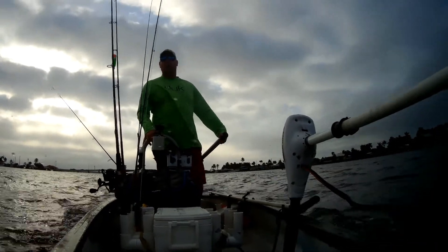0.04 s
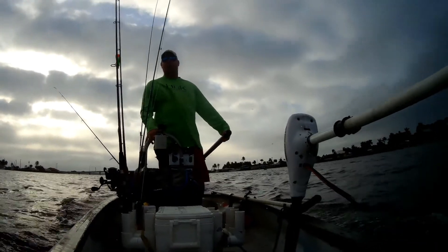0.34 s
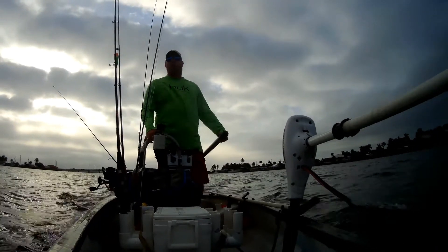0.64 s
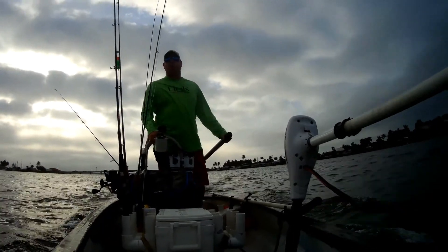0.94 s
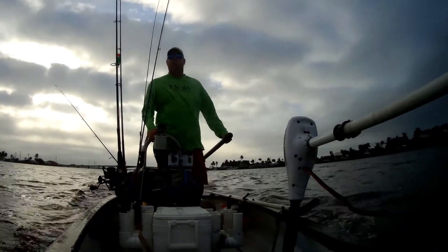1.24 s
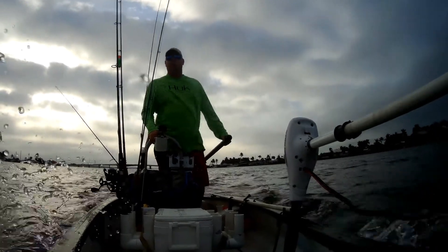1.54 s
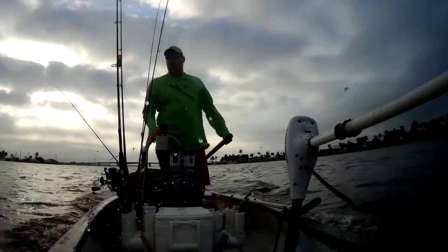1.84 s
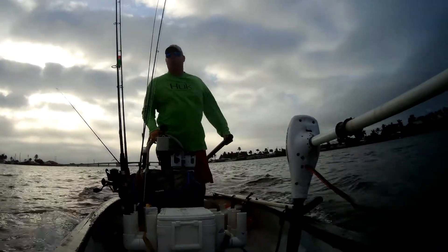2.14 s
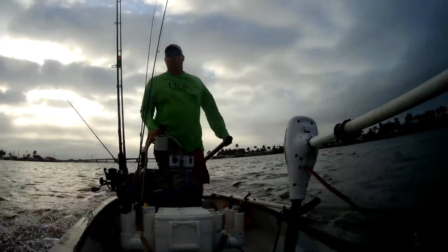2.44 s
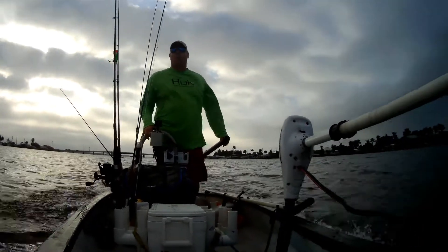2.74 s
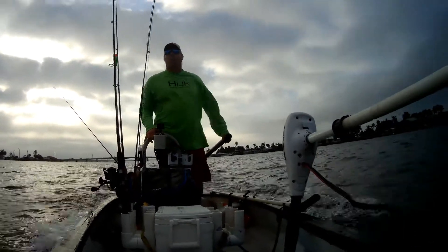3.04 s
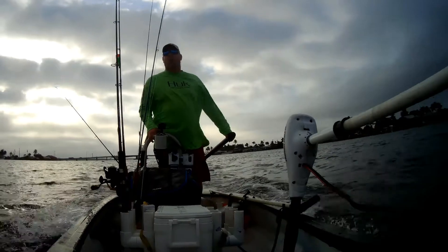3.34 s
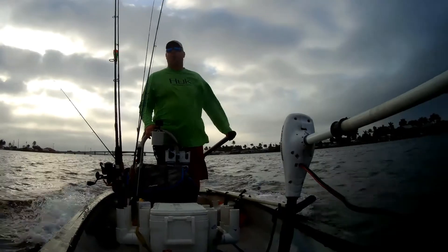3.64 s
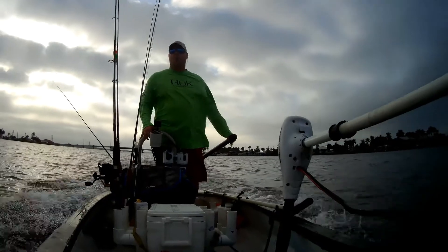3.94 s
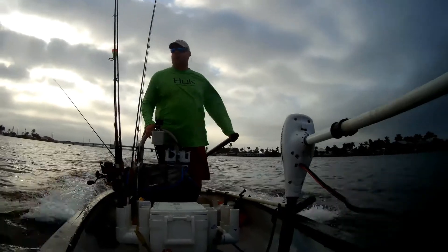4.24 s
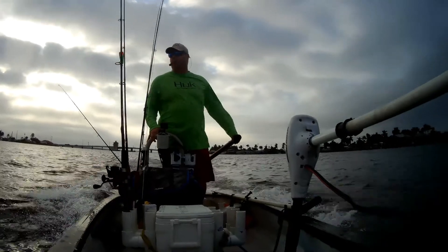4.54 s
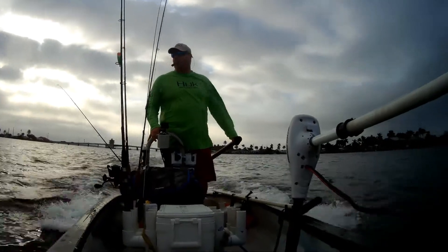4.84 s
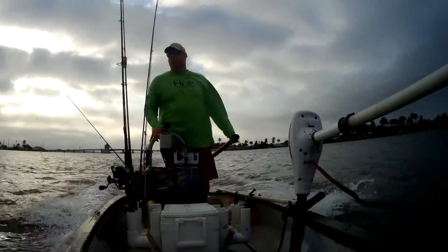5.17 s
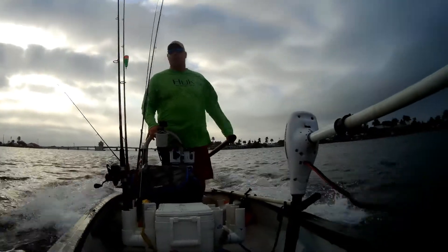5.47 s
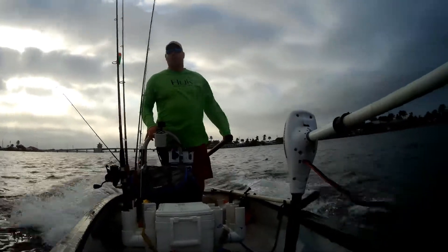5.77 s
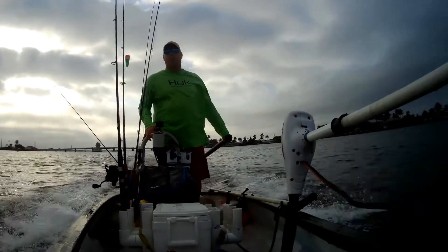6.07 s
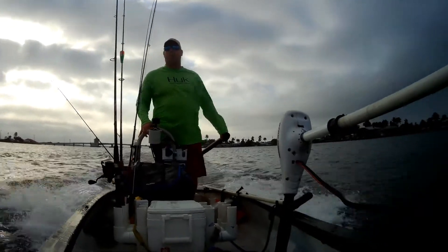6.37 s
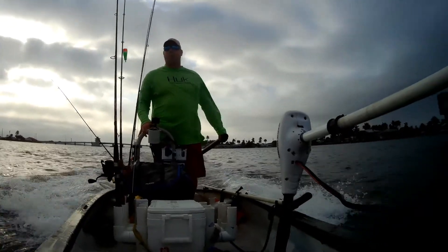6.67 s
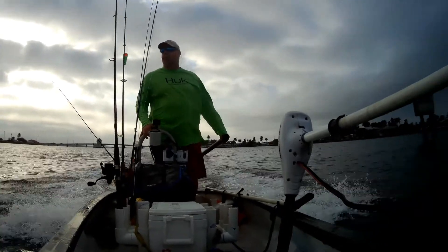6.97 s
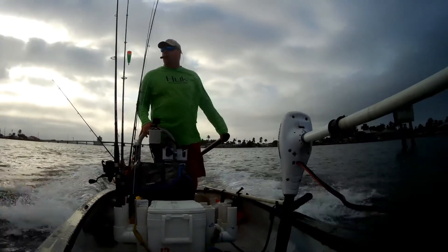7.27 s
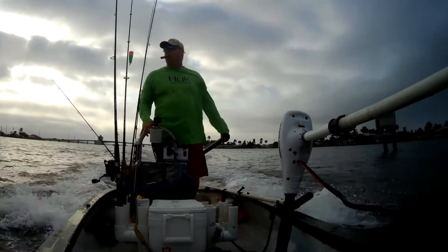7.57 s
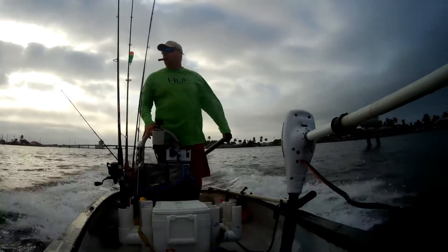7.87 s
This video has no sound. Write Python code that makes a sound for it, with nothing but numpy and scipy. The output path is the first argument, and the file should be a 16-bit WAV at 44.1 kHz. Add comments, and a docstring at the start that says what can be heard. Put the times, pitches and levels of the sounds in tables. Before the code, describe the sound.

A small outboard motor idles quietly for the first half second, with water bubbling and slapping against the hull of a skiff. At about 0.5 seconds the throttle opens, and the motor climbs quickly in pitch and loudness. By 2 seconds it is a loud, steady drone, which keeps rising slightly until the end at about 8 seconds. During the first 3 seconds, chop thumps the hull, the bow wave splashes and gurgles in surges, and a few drops click sharply on the camera case. After that the water merges into a more even rush with gentler swells and a faint hiss of spray, while low wind buffeting grows with the speed. From about 5 seconds, faint drops tick on the boat. Everything is heard on board through a closed waterproof case, which muffles the treble and adds a slight ring.

```python
"""A small four-stroke outboard idles, is throttled up and pushes a skiff onto the plane.
Firings and propeller blades drone through the hull, chop slaps it, the bow wave splashes and
bubbles, drops tick and wind buffets. All is heard on board through a closed waterproof camera
case, which rings and muffles the treble."""
import sys
import numpy as np
from scipy import signal
from scipy.fft import rfft, irfft
from scipy.io import wavfile
from scipy.ndimage import uniform_filter1d, minimum_filter1d

SR = 44100
rng = np.random.default_rng(int(sys.argv[2]) if len(sys.argv) > 2 else 0)


def transcribe(u):
    """Save the signal u as a 16-bit wav file named by the first command-line argument.

    u: samples, shape (n,) or (channels, n), limited to [-1, 1]; the rate is SR.
    q: integer samples, one column per channel.
    """
    v = np.clip(np.atleast_2d(u).T, -1, 1)
    q = np.round(v * 32767).astype(np.int16)
    wavfile.write(sys.argv[1], SR, q)


N = 357651


def undb(db):
    """Decibels to gain."""
    return 10 ** (np.asarray(db) / 20)


def unit(x):
    """Scale to rms 1."""
    return x / np.sqrt(np.mean(x ** 2))


def curves(table):
    """Each column after the time, interpolated per sample."""
    times_s, *columns = np.transpose(table)
    return [np.interp(np.arange(N) / SR, times_s, column) for column in columns]


def walk(rate_hz):
    """Smooth random drift, spread near 1."""
    hold = int(SR / rate_hz)
    steps = np.repeat(rng.standard_normal(N // hold + 1), hold)
    return 1.3 * uniform_filter1d(uniform_filter1d(steps, hold), hold)[:N]


def colour(x, points):
    """Minimum-phase filter through (Hz, dB) points, falling 12 dB an octave above them."""
    hz, db = np.transpose(points)
    size = 8192
    bins_hz = np.maximum(np.fft.rfftfreq(size, 1 / SR), 1)
    gain = undb(np.interp(np.log(bins_hz), np.log(hz), db)) / np.maximum(bins_hz / hz[-1], 1) ** 2
    cepstrum = irfft(np.log(gain))
    cepstrum[1:size // 2] *= 2
    cepstrum[size // 2 + 1:] = 0
    impulse = irfft(np.exp(rfft(cepstrum)))
    return signal.fftconvolve(x, impulse)[:len(x)]


def patter(per_s, spread_db):
    """Random impacts, most small, a few large."""
    size = undb(spread_db * np.minimum(rng.exponential(size=N), 5))
    hits = rng.random(N) < per_s / SR
    return unit(hits * size * rng.choice([-1, 1], N))


def burst(length_s):
    """Noise that swells quickly and dies away."""
    t = np.arange(SR // 4) / SR
    return rng.standard_normal(len(t)) * t / length_s * np.exp(-2 * t / length_s)


def add(out, start_s, x, peak_db):
    """Mix x in at the given start and peak."""
    i = int(start_s * SR)
    out[i:i + len(x)] += (x * undb(peak_db) / np.abs(x).max())[:N - i]


def bubble(hz, cycles):
    """Damped ring, 1/e after `cycles`; the pitch rises as the bubble nears the surface."""
    age = np.arange(int(7 * cycles / hz * SR)) * hz / cycles / SR
    onset = 1 - np.exp(-2 * age * cycles)
    return onset * np.exp(-age) * np.sin(2 * np.pi * cycles * (age + .015 * age ** 2))


# Boat and exhaust resonances. Each row: centre in Hz, width in Hz, gain in dB.
RESONANCES = [(38, 12, -19.5), (76.2, 6.5, -16), (88.1, 1.7, -15), (107.3, 15.93, -12.5), (140, 24, -23.5),
              (171.17, 9.8, -16), (202, 5.2, -24.5), (249, 14, -21.5), (303.5, 2.2, -14), (332.8, 22.9, -9)]

def boat_gain_db(hz):
    """How strongly the boat radiates a tone at this pitch."""
    power = sum(undb(db) ** 2 / (1 + (2 * (hz - centre_hz) / width_hz) ** 2)
                for centre_hz, width_hz, db in RESONANCES)
    return 10 * np.log10(power)


# Motor effort, with a throttle blip. Each row: time in seconds, level in dB, lift of orders 3-5 in dB.
MOTOR_EFFORT = [(0, -18, 3), (.5, -23, -5), (.56, -11, 7), (.62, -12, -2), (.73, -3, -4.5),
                (.9, -1.5, -6.5), (1.12, 0, -6), (1.4, 1.5, 1.5), (1.85, 3.5, -4), (2.6, 3.5, -9),
                (4.4, 3, -8), (5.8, 1.5, -6), (8.11, 3, -9.5)]
# Slow wavering in dB, one value for each of orders 1-5.
ORDER_SWAY_DB = [.8, .4, 2.6, 1.5, 2.6]
# Weaker motor lines. Each row: multiple of the firing rate, level in dB relative to the load.
MINOR_ORDERS = [(2.5, -37.5), (3.5, -30.5), (4.5, -35), (6, -38), (7, -42), (8, -38.5)]

def motor(firing_hz, firings, planing, load_db):
    """Each firing is a pressure dip made of the low orders; unequal cylinders add half orders."""
    effort_db, lift_db = curves(MOTOR_EFFORT)
    roughness = 70 / firing_hz  # slow running fires less evenly
    angle = 2 * np.pi * firings + .03 * roughness * walk(35)
    smear_rad = 4 * (1 - planing)  # a hull deep in the water spreads each dip in time
    out = np.zeros(N)
    for order, sway_db in enumerate(ORDER_SWAY_DB, 1):
        level_db = effort_db + boat_gain_db(order * firing_hz) + (order > 2) * lift_db
        waver_db = sway_db * walk(12) + .88 * roughness * walk(22)
        lag_rad = smear_rad * order * (order - 1) / 2
        out -= undb(level_db + waver_db) * np.cos(order * angle - lag_rad)
    for order, db in MINOR_ORDERS:
        out += undb(db + load_db + 3 * walk(9)) * np.cos(order * angle + .7 * walk(12))
    return np.sqrt(2) * out * undb(.13)


def propeller(firings, load_db, blades=3, gear_ratio=2.08):
    """Geared-down blades throb in uneven water."""
    angle = 2 * np.pi * firings * blades / gear_ratio + .4 * walk(7)
    inflow_db = 2.5 * walk(7)
    return undb(load_db - 26 + inflow_db) * np.cos(angle)


def firing_noise(firings, decay_cycles):
    """Noise that jumps at each firing and decays until the next."""
    return unit(np.exp(-(firings % 1) / decay_cycles) * rng.standard_normal(N))


# Waves met by the bow. Each row: start in seconds, length in seconds, surge in dB.
WAVE_SURGES = [(0, .06, 2.5), (.21, 0.16, 4.5), (.37, .08, 6), (0.826, .07, 6.5), (0.973, .32, 7),
               (1.48, .04, 4.5), (1.629, .2, 8.5), (1.868, 0.18, 6.5), (2.04, .26, 8), (2.52, 0.11, 5.5),
               (2.657, .08, 9), (2.9, .24, 3), (3.54, .28, 2.5), (4.119, 0.093, 3.5), (4.29, 0.082, 4),
               (4.86, 0.064, 1), (5.061, .07, 3), (5.22, 0.09, 5), (5.722, .14, 3), (6.3, .07, 2.5),
               (6.9, .09, 3.5), (7.832, .16, 2.5)]

def surge_db(attack_s=.03, release_s=.03, ripple_db=.82):
    """Each wave swells, holds while the bow cuts through and falls away; small chop ripples between."""
    t = np.arange(N) / SR
    level_db = ripple_db * walk(22)
    for start_s, length_s, db in WAVE_SURGES:
        rise = (t - start_s) / attack_s
        fall = 1 + (start_s + length_s - t) / release_s
        level_db += db * np.clip(np.minimum(rise, fall), 0, 1)
    return level_db


# Hull panel response. Each row: frequency in Hz, gain in dB.
HULL_SPECTRUM = [(120, -25.5), (205, -6), (255, -6.5), (300, 0.5), (338, 4.5), (370, 2.5), (410, -6.5),
                 (500, -8), (570, -11), (640, -10.5), (700, -5.5), (760, -17), (820, -23.5), (1400, -66)]

def hull_drumming(firings, drum_db, load_db):
    """Rushing water and the kick of each firing shake the hull panels."""
    kicks = firing_noise(firings, decay_cycles=.25)
    shake = patter(per_s=900, spread_db=2.2) + undb(load_db - 1.5) * kicks
    return unit(colour(shake, HULL_SPECTRUM)) * undb(drum_db + 4 + 1.1 * walk(18))


def froth(low_hz, high_hz, spread_db, count):
    """Many bubbles of random size, most faint, a few loud."""
    out = np.zeros(N)
    for when, size, life, rank in rng.random((count, 4)):
        hz = low_hz * (high_hz / low_hz) ** size
        peak_db = -spread_db * np.log(rank + .02)
        add(out, when * N / SR, bubble(hz, cycles=4 + 10 * life), peak_db)
    return unit(out)


# Bow wash and spray spectra. Each row: frequency in Hz, gain in dB.
WASH_SPECTRUM = [(500, -34), (820, -27), (890, -7), (1130, -6.5), (1300, 2.5), (1500, -2.5), (1750, -4.5),
                 (1860, -16), (1970, -27.5), (2280, -22.5), (2650, -41), (6000, -55)]
SPRAY_SPECTRUM = [(1500, -25), (2300, -7.5), (2700, -11), (3100, -5.5), (3650, -1.5), (3980, -8.5),
                  (4350, 4), (4650, -4), (4950, 1), (5600, -13.5), (7000, -21.5), (9000, -27), (10500, -27),
                  (11700, -34)]

def bow_wave(firings, planing, wash_db, spray_db):
    """Slow water gurgles in single bubbles; on the plane it merges into a rush with motor clatter."""
    clatter = undb(-1.5) * firing_noise(firings, decay_cycles=1.3)
    bubble_gain = undb(-10.5 * planing)
    gurgle = bubble_gain * froth(796.7, 2300, spread_db=2.1, count=2600)
    gurgle += undb(3.5) * patter(per_s=3000, spread_db=1.6) + clatter
    fizz = bubble_gain * froth(2000, 9000, spread_db=3.4, count=6000)
    fizz += patter(per_s=1500, spread_db=4.2) + clatter
    wash = unit(colour(gurgle, WASH_SPECTRUM)) * undb(wash_db - 2.5 + .99 * walk(35))
    spray = unit(colour(fizz, SPRAY_SPECTRUM)) * undb(spray_db - 2 + 1.5 * walk(30))
    return wash + spray


# Mist spectrum. Each row: frequency in Hz, gain in dB.
MIST_SPECTRUM = [(3000, -3), (5800, 1.5), (6600, -2), (8000, -1.5), (9300, -7), (10000, -0.5), (10900, -5),
                 (11500, -12.5), (12700, -7.5), (13200, -13), (15500, -15)]

def mist(spray_db):
    """Fine mist sizzles faintly, following the spray."""
    sizzle = rng.standard_normal(N) + undb(-2.5) * patter(per_s=700, spread_db=3)
    level_db = -62.5 + .56 * (spray_db - spray_db.mean()) + 1.5 * walk(27)
    return unit(colour(sizzle, MIST_SPECTRUM)) * undb(level_db)


# Buffeting spectrum. Each row: frequency in Hz, gain in dB.
WIND_SPECTRUM = [(10, -45.5), (25, -24), (45, -17.5), (65, -12.5), (85, -3.5), (100, 7.5), (122, -1),
                 (145, -7.5), (250, -20), (600, -52.5)]

def wind(planing):
    """Buffeting on the case grows with the boat's speed."""
    gust_db = 1.3 * walk(6)
    rumble = unit(colour(rng.standard_normal(N), WIND_SPECTRUM))
    return rumble * undb(-34 + 13.1 * planing + gust_db)


# Case response. Each row: frequency in Hz, gain in dB.
CASE_SPECTRUM = [(200, -19), (700, 9), (1400, 15), (1800, 13), (2600, -4.5), (4500, -29.5), (6000, -12.5),
                 (11000, -40), (15000, -59)]
# Drops on the case. Each row: start in seconds, peak in dB, tilt in dB per decade.
CASE_DROPS = [(0.031, -6, 4), (0.865, -14, -21), (1.49, -32, 40), (1.518, -29, 12), (1.65, -32, 16),
              (2.363, -32, 6), (2.576, -20, -13), (2.72, -13, -1), (2.745, -23, 2)]

def case_drops():
    """Drops strike the case and ring it."""
    out = np.zeros(N)
    for start_s, db, tilt_db in CASE_DROPS:
        tilted = [(hz, gain_db + tilt_db * np.log10(hz)) for hz, gain_db in CASE_SPECTRUM]
        add(out, start_s, colour(burst(length_s=.0005), tilted), db)
    return out


# Large bubbles. Each row: start in seconds, relative peak in dB, pitch in Hz, cycles to 1/e.
LARGE_BUBBLES = [(0.046, -13.5, 1665, 19), (.213, -23.5, 2310, 21), (0.226, -16, 1540, 21),
                 (0.253, -11.5, 1720, 16), (0.26, -14, 1310, 6.8), (0.293, -14, 1313, 27),
                 (.404, -10, 696, 11), (0.425, -14, 1560, 23), (.461, -13, 1200, 5.1),
                 (0.711, -13, 1660, 7.8), (.96, -11, 730, 6.1), (1.053, -10, 694, 9.3),
                 (1.159, -16, 1676, 17), (1.225, -9.5, 1330, 13), (1.245, -10, 509.6, 7.6),
                 (1.509, -20.5, 4760, 14), (1.697, -19, 2960, 6.7), (1.7983, -4, 1400, 6.1),
                 (2.19, -20, 4390, 16.4)]

def large_bubbles():
    """Single bubbles ring out above the wash."""
    out = np.zeros(N)
    for start_s, db, hz, cycles in LARGE_BUBBLES:
        add(out, start_s, bubble(hz, cycles), db - 5.5)
    return out


# Slaps. Each row: start in seconds, relative peak in dB, panel pitch in Hz, length in seconds.
HULL_SLAPS = [(0.085, -6, 364, 0.023), (0.242, -10, 352, 0.0093), (0.341, -9, 345, 0.01),
              (0.388, -15.5, 710, 0.034), (0.456, -7.5, 357, 0.02), (0.546, -6, 320, 0.0087),
              (0.772, -7.5, 335, 0.028), (0.859, -10.5, 562, 0.025), (0.95, -6, 686, 0.019),
              (1.263, -1.5, 338, 0.019), (2.57, -2, 329.5, 0.047), (3.08, -7, 349.2, 0.035)]

def hull_slaps(width_hz=140):
    """Waves slap the hull, each ringing one panel resonance."""
    out = np.zeros(N)
    for start_s, db, hz, length_s in HULL_SLAPS:
        thud = colour(burst(length_s), HULL_SPECTRUM)
        panel = signal.iirpeak(hz, hz / width_hz, fs=SR)
        add(out, start_s, signal.lfilter(*panel, thud), db - 4)
    return out


# Splashes. Each row: start in seconds, relative peak in dB.
BOW_SPLASHES = [(0.229, -16), (0.462, -15), (0.7115, -26), (0.8635, -14), (1.0488, -13), (1.2258, -18),
                (1.6397, -15), (1.697, -10), (1.7972, -11), (1.83, -11), (2.1333, -13.5), (2.1951, -13),
                (2.5764, -12.5), (2.6972, -11.5), (2.718, -16), (2.9895, -19)]

def splashes():
    """Water breaks beside the bow: a burst of wash with a trace of spray."""
    out = np.zeros(N)
    for start_s, db in BOW_SPLASHES:
        water = burst(length_s=.007)
        splash = colour(water, WASH_SPECTRUM) + undb(-24) * colour(water, SPRAY_SPECTRUM)
        add(out, start_s - .002, splash, db - 3.5)
    return out


# Drops on the boat. Each row: start in seconds, relative peak in dB, pitch in Hz.
BOAT_DROPS = [(5.3265, -33, 2151), (5.548, -34, 2422), (5.7258, -33, 2704), (5.936, -31.5, 2319),
              (6.273, -33, 2370), (6.714, -34, 3200), (6.93, -36, 2717), (6.956, -27, 4360),
              (7.066, -31.5, 2198), (7.193, -38, 2750), (7.86, -36.5, 3404), (7.953, -24.5, 2100),
              (8.056, -32, 2233)]

def boat_drops():
    """A drop on a hard surface ticks, ringing for only a cycle or two."""
    out = np.zeros(N)
    for start_s, db, hz in BOAT_DROPS:
        add(out, start_s, bubble(hz, cycles=1.5), db - 3)
    return out


# Motor speed. Each row: time in seconds, firing rate in Hz.
FIRING_RATE = [(0, 35.76), (.3, 35.5), (.45, 33.66), (.55, 37.55), (.7, 47.57), (.78, 55.36), (.86, 61.83),
               (1.1, 67.44), (1.45, 70.84), (1.88, 73.4), (2.35, 74.32), (2.55, 76.73), (3, 78.33),
               (3.85, 81.4), (4.9, 83.38), (5.6, 85.42), (6.7, 87.1), (8.11, 88.98)]
# Motor load. Each row: time in seconds, relative level in dB.
MOTOR_LOAD = [(0, -26), (.55, -15.5), (.8, -4), (1.2, -5), (2.2, 2), (3.8, 3), (5, -2.5), (6.5, -4),
              (8.11, -6.5)]
# Water between waves. Each row: time in seconds, then relative drumming, wash and spray levels in dB.
WATER_LEVELS = [(0, -27, -30, -46), (.7, -26.5, -33, -51), (1.45, -26.5, -33.5, -49),
                (2.4, -25, -30, -49.5), (3.2, -23.5, -25.5, -48), (4.05, -23.5, -26.5, -45.5),
                (4.9, -24, -28.5, -50), (6.6, -26.5, -30.5, -51.5), (8.11, -26.5, -30.5, -54.5)]

def scene():
    """Motor speed times every throb; the water surges with each wave as the boat gathers speed."""
    firing_hz, = curves(FIRING_RATE)
    load_db, = curves(MOTOR_LOAD)
    drum_db, wash_db, spray_db = curves(WATER_LEVELS)
    wave_db = surge_db()
    drum_db += .63 * wave_db
    wash_db += .89 * wave_db
    spray_db += .92 * wave_db
    firings = np.cumsum(firing_hz) / SR
    planing = (firing_hz / firing_hz.max()) ** 4  # near 0 at idle, 1 at full speed
    drive = motor(firing_hz, firings, planing, load_db) + propeller(firings, load_db)
    water = hull_drumming(firings, drum_db, load_db) + bow_wave(firings, planing, wash_db, spray_db)
    chop = case_drops() + large_bubbles() + hull_slaps() + splashes() + boat_drops()
    return (drive + water + mist(spray_db) + wind(planing) + chop)[None]


def record(dry):
    """Peak limiter, then a steep low-pass."""
    ceiling, cutoff_hz = .97, 15600
    needed_gain = np.minimum(1, ceiling / np.maximum(np.abs(dry), 1e-9))
    held_gain = minimum_filter1d(needed_gain, size=601)
    gain = uniform_filter1d(uniform_filter1d(held_gain, size=301), size=301)
    lowpass = signal.ellip(8, .2, 70, cutoff_hz, fs=SR, output="sos")
    return signal.sosfilt(lowpass, dry * gain)


dry = scene()
out = record(dry)
transcribe(out)
```